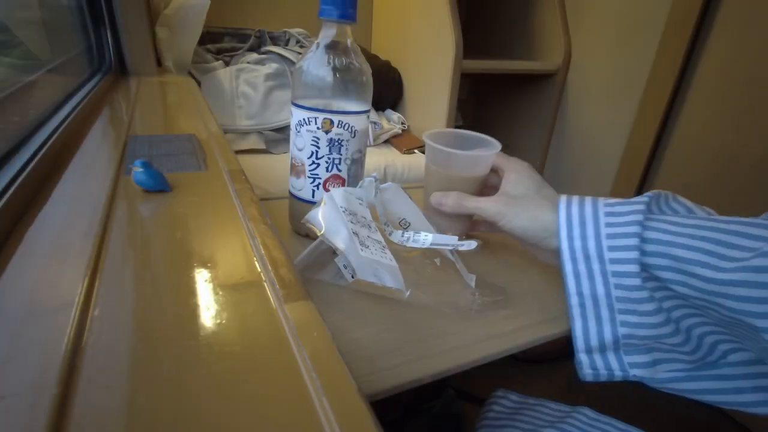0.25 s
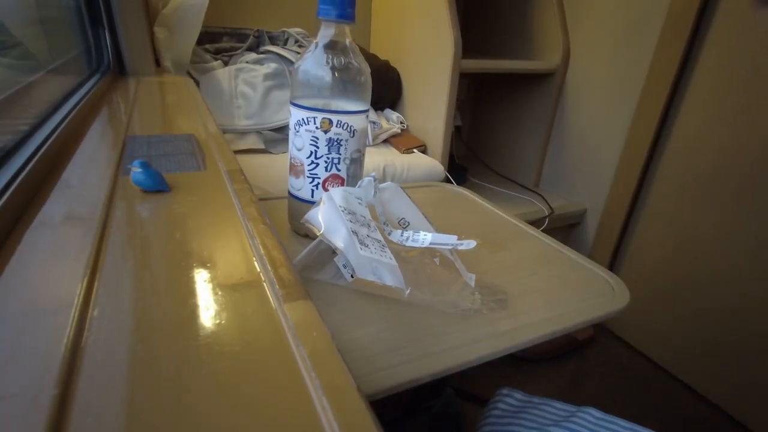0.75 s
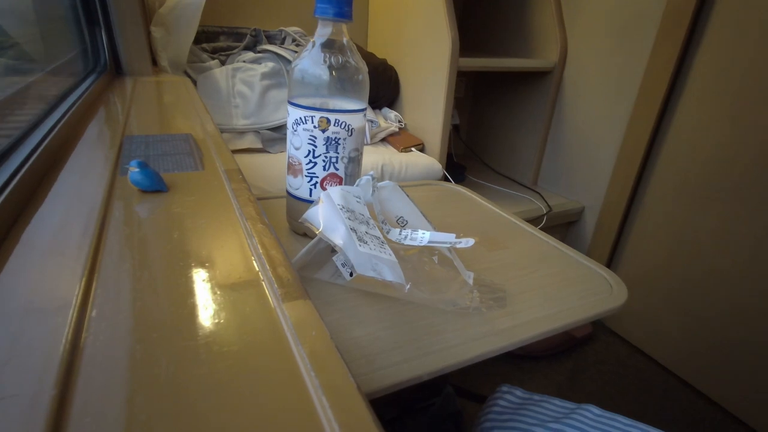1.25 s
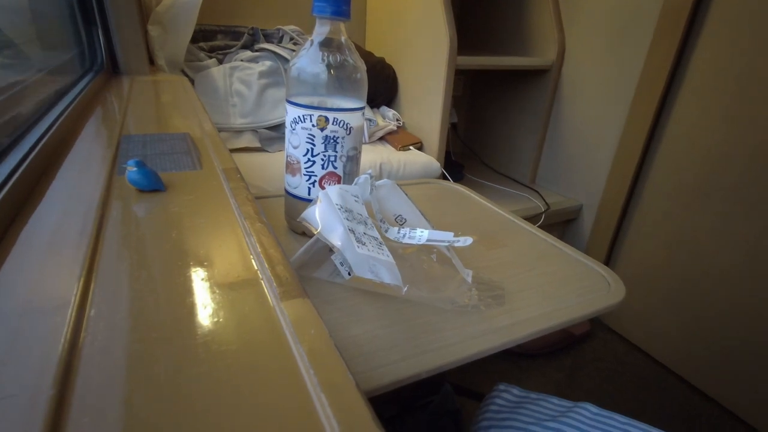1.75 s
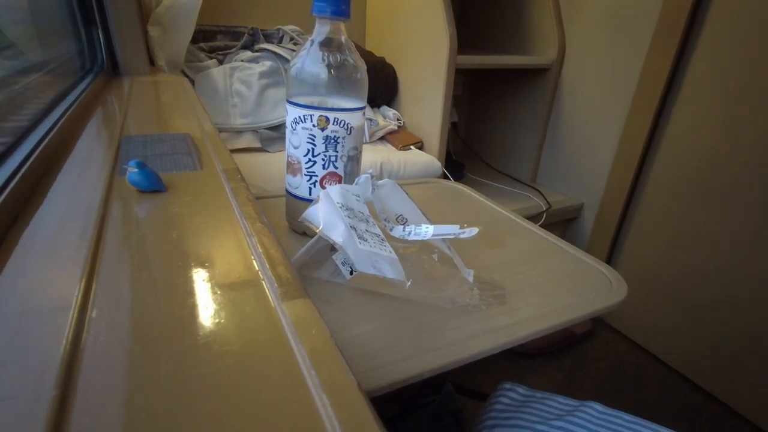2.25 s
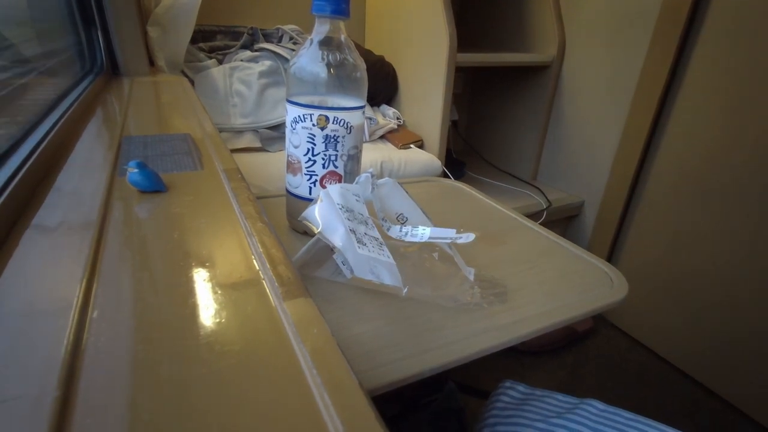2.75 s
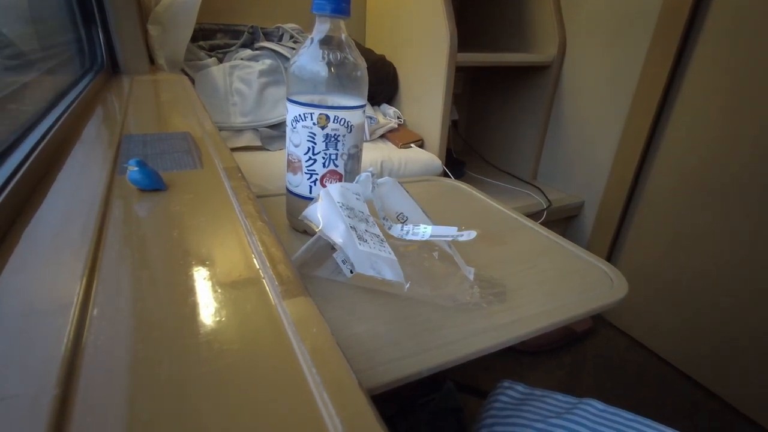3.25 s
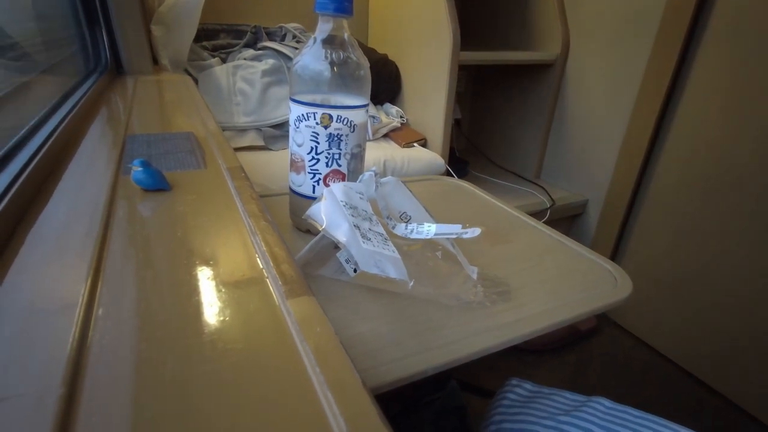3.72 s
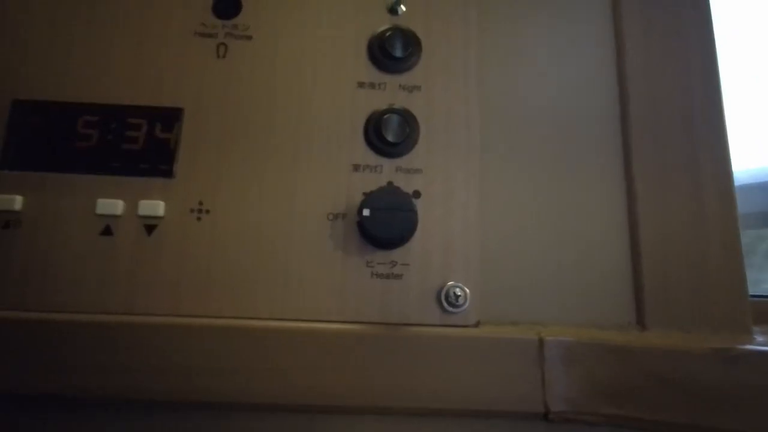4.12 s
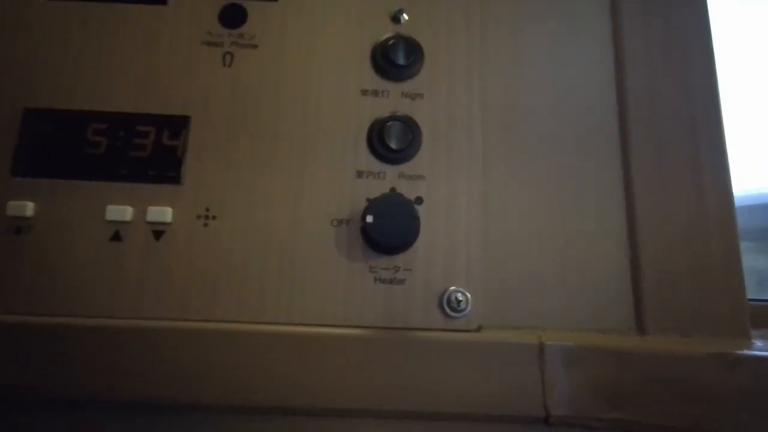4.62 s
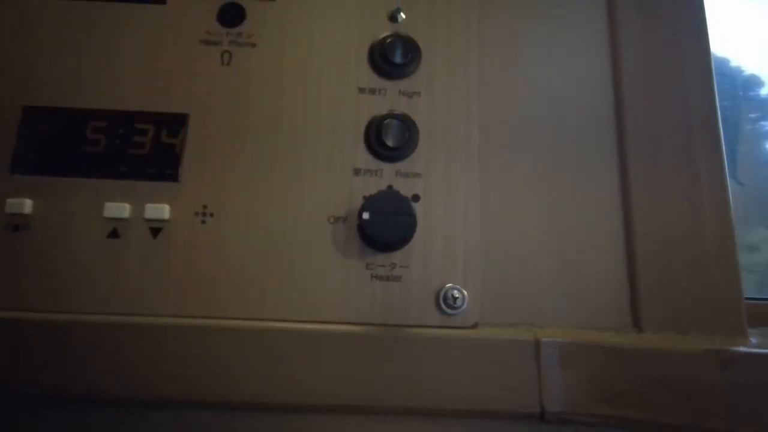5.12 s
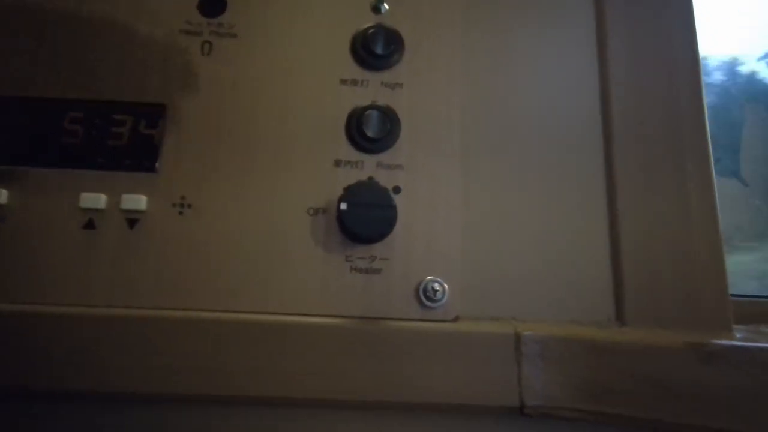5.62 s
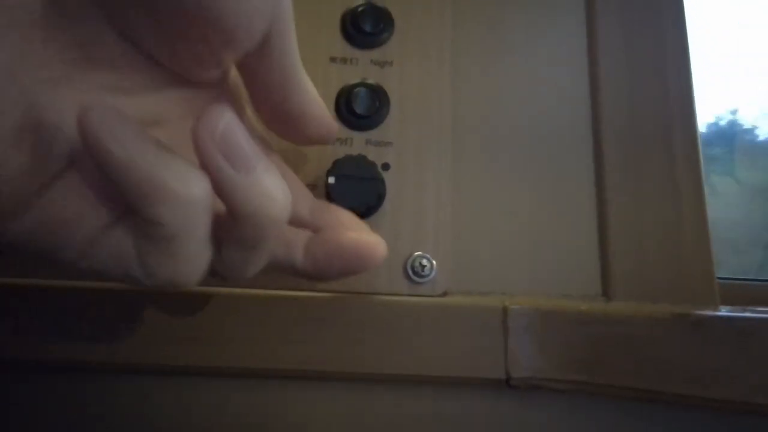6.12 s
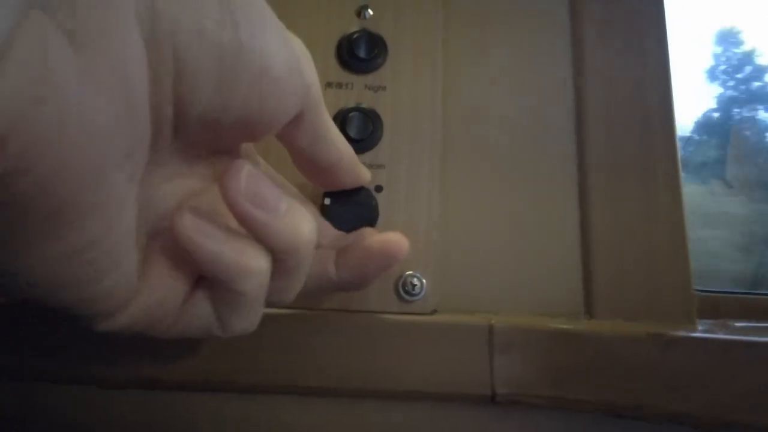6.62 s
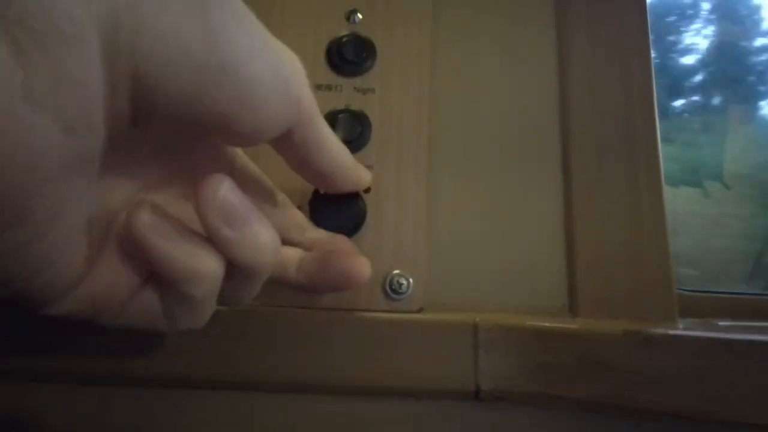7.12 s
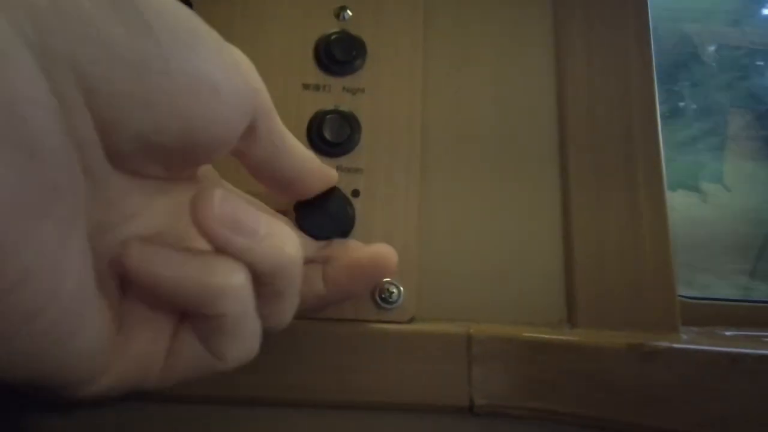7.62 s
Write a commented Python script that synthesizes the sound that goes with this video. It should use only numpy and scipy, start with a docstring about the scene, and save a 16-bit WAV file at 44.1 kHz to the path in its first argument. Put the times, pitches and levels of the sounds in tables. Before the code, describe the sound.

Close interior listening in a moving train: the first three seconds are rough, with dense hollow bangs, booming floor, rattling fittings and thin paper crackles. It eases, a sharp click follows, and the listening place shifts beside the window. There the train rolls more quietly with steady air rush, faint motor hum, a very high thin whistle, three spaced rail-joint thumps and two tiny ticks.

```python
"""Sleeper cabin of a running train

Wheels roll with a steady rumble and jolt over points; each blow is a burst of chatter and a strike that
rings floor, panels, truck and fittings. The shaking makes a paper wrapper crackle on the table.
After a dry click the train is heard from the window wall, thumping over a rail joint about once a second.
Flanges scrape now and then as resonant noise, air rushes past, a motor hums as a wavering sine."""
import sys
import numpy as np
from scipy import signal
from scipy.fft import rfft, irfft, next_fast_len
from scipy.io import wavfile
from scipy.ndimage import uniform_filter1d, map_coordinates

SR = 44100
rng = np.random.default_rng(int(sys.argv[2]) if len(sys.argv) > 2 else 0)


def to_wav(sig):
    """Store sig (one row per channel, or 1-D mono) as 16-bit WAV at the path in sys.argv[1].

    Samples outside -1..1 are clipped; the rate is SR.
    """
    pcm = np.clip(np.atleast_2d(sig), -1, 1) * 32767
    pcm = np.round(pcm).astype(np.int16)
    wavfile.write(sys.argv[1], SR, pcm.T)  # frames by channels


N = 346626
TIME_S = np.arange(N) / SR

# resonances; all mode tables: (centre [Hz], width [Hz], relative level [dB])
FLOOR_MODES = [(56.7, 11, -16.5), (99.7, 18, 0.5), (139.3, 15, 0), (197.8, 22.2, 4.5)]
# wall panels: (centre [Hz], width [Hz], relative level [dB])
PANEL_MODES = [(253.6, 22, -10), (324.2, 24.6, -0.5), (433.5, 27, -7), (494.7, 27, -12.5)]
# wheel truck: (centre [Hz], width [Hz], relative level [dB])
TRUCK_MODES = [(576, 43, -2), (653, 41, 3.5), (749, 72, -0.5), (884.5, 39.7, -5), (1000, 120, -18)]
# cabin fittings: (centre [Hz], width [Hz], relative level [dB])
FITTING_MODES = [(1230, 140, -10), (1534, 70, 3), (1900, 160, 0), (2104, 83, 2), (2550, 360, -9.5),
                 (3100, 220, -13), (3430, 360, -19)]
# car body: (centre [Hz], width [Hz], relative level [dB])
BODY_MODES = [(178, 48, 0), (336, 51, 2), (446, 34, 1), (567.5, 40, -7), (702, 45, -10.5), (776, 68, -13)]
# flange on rail: (centre [Hz], width [Hz], relative level [dB])
FLANGE_MODES = [(540, 110, -2), (762, 50, 7.5), (864, 25, 7.5), (1060, 50, -10.5), (1192, 45, -11)]
# sidewall on rough rail: (centre [Hz], width [Hz], relative level [dB])
DRONE_MODES = [(144, 4.4, 3), (171.4, 21, -0.5)]

# rumble spectrum: (frequency [Hz], relative density [dB per Hz])
RUMBLE_SPECTRUM = [(12, -20), (25, -22), (55, -2.5), (76, -8), (100, 1), (125, -2.5), (150, -5), (190, 1),
                   (225, -7), (275, -8.5), (400, -21.5), (600, -24.5), (1000, -69), (2000, -120)]
# air rush spectrum: (frequency [Hz], relative density [dB per Hz])
AIR_SPECTRUM = [(300, -48.5), (500, -12), (620, 0), (780, -3.5), (880, -6.5), (1100, -16), (1350, -20),
                (1520, -20), (1700, -21.5), (2050, -16), (2600, -26), (3300, -27.5), (5000, -34),
                (9000, -36), (15500, -38.5)]
# paper spectrum: (frequency [Hz], relative density [dB per Hz])
PAPER_SPECTRUM = [(1500, -26.5), (3200, -1), (4700, -15.5), (5900, -5), (7100, -1), (8600, -17),
                  (11000, -19.5), (16000, -26)]
# click spectrum: (frequency [Hz], relative level [dB])
CLICK_SPECTRUM = [(500, -43), (1200, 4.5), (2000, -7), (4000, -10), (9000, -15.5), (15000, -23.5)]
# cabin colouring of the train by the window wall: (frequency [Hz], gain [dB])
WINDOW_GAIN = [(55, 0), (95, 3.5), (140, 1), (200, -1.5), (300, 2), (450, -1.5), (720, -1.5), (1000, 4.5),
               (1300, -0.5), (1530, 0), (1750, -2), (2060, -2), (2600, -5), (3300, -1.5), (8000, 0)]

# rolling, before trims: (time [s], rumble [dB], track roughness [dB])
ROLL = [(0.0, -36, -42.5), (0.22, -48.5, -46), (0.53, -34.5, -31.5), (0.74, -42.5, -42.5),
        (1.2, -30.5, -42), (1.42, -43, -44.5), (1.73, -47, -44.5), (1.88, -33, -29.5), (1.97, -28.5, -30.5),
        (2.34, -34.5, -33), (2.74, -33, -33.5), (3.48, -39.5, -51), (4.42, -43.5, -54.5), (4.92, -39, -54),
        (5.47, -40, -51), (6.06, -39.5, -45), (6.26, -42, -49), (7.86, -41.5, -47)]
# flange scrapes: (time [s], length [s], level [dB])
SCRAPES = [(0.551, 0.34, -41.5), (2.405, 0.11, -49.5), (3.049, 0.24, -39), (7.188, 0.17, -47.5)]
# ticks and rattles: (time [s], peak [dB], centre [Hz], width before steepening [Hz], noise t60 [s])
TICKS = [(0.529, -63, 3360, 603, 0.35), (0.965, -47.5, 3330, 1200, 0.17), (1.03, -62.5, 3380, 300, 0.99),
         (5.61, -38.5, 1220, 1090, 0.016), (5.768, -41, 990, 900, 0.014)]
# loudest wrapper snaps: (time [s], peak before trim [dB])
SNAPS = [(0.4194, -50), (0.4508, -45), (0.4617, -42), (0.4712, -37), (0.5282, -46), (1.0889, -50.5),
         (1.8878, -45.5), (2.0697, -51.5), (2.833, -50.5), (3.0684, -53.5), (3.1232, -52)]
# gaps in the points, levels before trims: (time [s], panel knock [dB], floor boom [dB],
# truck clank [dB], fittings ring [dB], second axle relative to first [dB])
POINTS = [(0.447, -5, -34, -25.5, -46, -2), (1.226, -17.5, -31.5, -40.5, -70, -6.5),
          (1.898, -12.5, -17, -27.5, -49.5, -0.5), (1.947, -14.5, -12, -24, -54, -1.5),
          (2.693, -5.5, -23, -23.5, -47.5, -3)]
# rail joints, levels before trims: (time [s], panel knock [dB], floor boom [dB], boom pitch [Hz],
# truck clank [dB], settling boom [dB])
JOINTS = [(4.786, -25.5, -26, 140.5, -37.5, -25.5), (5.848, -20, -29.5, 189, -34, -38.5),
          (6.907, -24, -27, 127, -34.5, -21)]
# single jolts, levels before trims: (time [s], panel knock [dB], floor boom [dB], boom pitch [Hz],
# truck clank [dB])
JOLTS = [(0.205, -24.5, -40.5, 196, -60), (0.323, -14, -49, 234, -54.5), (0.966, -12, -20.5, 140, -31),
         (1.464, -25.5, -52.5, 222, -53), (1.698, -12.5, -48, 238, -57), (1.766, -16.5, -20.5, 190, -33.5),
         (1.84, -15, -24.5, 152, -49.5), (2.177, -18.5, -26.5, 231, -38), (2.33, -24, -23.5, 192, -43.5),
         (3.003, -34, -29, 100, -48), (3.121, -15.5, -36, 229, -41), (3.572, -35, -42, 155, -44),
         (3.932, -35, -32, 100, -54), (4.613, -42, -31, 196, -61), (6.192, -38.5, -37.5, 110, -44)]

TOP_HZ = 15550
WINDOW_S, CROSSFADE_S = 3.9825, 0.011  # move to the window wall
AIR_DB, AIR_WAVER_DB, AIR_WAVER_PER_S = -56, 0.45, 7
MOTOR_HZ, MOTOR_TABLE_DB, MOTOR_WINDOW_DB = 797, -56.5, -63
WHINE_HZ, WHINE_DB = 6000, -87.5
SWOOPS_PER_S, SWOOP_BASE_S, SWOOP_TOP_HZ, SWOOP_BASE_DEPTH_HZ, SWOOP_WAVER_HZ = 12, 0.07, 16000, 2900, 330
WHISTLE_DB = -78
RUMBLE_TRIM_DB, BODY_TRIM_DB = 1.5, 1
DRONE_S, DRONE_LENGTH_S, DRONE_DB = 2.95, 0.78, -36
SNAP_TRIM_DB = -1
CREASES_PER_S, CREASE_SCATTER_DB, CREASE_T60_S = 93, 5, 0.0072
RUSTLE_DB, RUSTLE_DB_PER_SHAKE_DB, SHAKE_WINDOW_S = -78.5, 0.3, 0.08
LEAD_S = .05  # chatter ahead of the strike
# base t60s: each set of modes stretches them
POINTS_AXLE_GAP_S, POINTS_BASE_T60_S, POINTS_BOOM_HZ = 0.122, 0.12, 205
JOINT_AXLE_GAP_S, JOINT_BASE_T60_S = 0.097, 0.2
JOLT_BASE_T60_S = 0.17
SETTLE_S, SETTLE_HZ, SETTLE_BASE_T60_S = 0.145, 100, 0.12
JOINT_RING_DB, JOLT_RING_DB = -18.5, -22.5  # relative to the clank
SECOND_BOOM_DB, SECOND_RING_DB, JOINT_SECOND_KNOCK_DB = 2.5, -4, 3.5  # second axle relative to first
REBOUND_S, REBOUND_DB, REBOUND_BOOM_DB, REBOUND_T60_RATIO = 0.02, -8.5, -2, 1.52


def amp(db):
    """Decibels to gain."""
    return 10 ** (np.asarray(db) / 20)


def unit(x):
    """x at rms 1."""
    return x / np.sqrt(np.mean(x ** 2) + 1e-20)


def curves(rows):
    """One value per sample for each column after the time."""
    s, *cols = np.transpose(rows)
    return [np.interp(TIME_S, s, c) for c in cols]


def wobble(knots_per_s):
    """Smooth random curve."""
    knots = rng.standard_normal(int(N * knots_per_s / SR) + 4)
    return map_coordinates(knots, [TIME_S * knots_per_s])


def filtered(x, response):
    """x times a complex response of frequency."""
    size = next_fast_len(len(x) + 8192)
    spectrum = rfft(x, size) * response(np.fft.rfftfreq(size, 1 / SR))
    return irfft(spectrum, size)[:len(x)]


def colour(points):
    """Response through (Hz, dB) points on a log axis."""
    hz, db = np.transpose(points)
    return lambda f: amp(np.interp(np.log(f + 1), np.log(hz), db))


def resonant(modes):
    """Causal response of a set of modes; the cabin lining absorbs what lies above them."""
    edge_hz = 1.258 * max(hz for hz, _, _ in modes)

    def response(f):
        total = 0
        for k, (hz, width_hz, db) in enumerate(modes):
            mode = 1j * f * width_hz / (hz * hz - f * f + 1j * f * width_hz)
            total = total + (-1) ** k * amp(db) * mode  # alternating polarity
        lining = signal.freqs(*signal.butter(N=6, Wn=1, analog=True), f / edge_hz)[1]
        return lining * total

    return response


def fade(t, t60):
    """Exponential decay, 60 dB in t60."""
    return np.exp(-np.log(1000) * t / t60)


def add(track, s, sound):
    """Mix a sound into the track at s seconds."""
    part = track[max(round(s * SR), 0):][:len(sound)]
    part += sound[:len(part)]


def arch(s, length_s):
    """Rounded swell from s seconds on."""
    return np.abs(np.sin(np.pi * np.clip((TIME_S - s) / length_s, 0, 1))) ** 0.44


def near_window():
    """0 over the table, 1 by the window wall."""
    return np.clip((TIME_S - WINDOW_S) / CROSSFADE_S, 0, 1)


def whistle():
    """Thin, very high whistle dips in short swoops; the longer a swoop, the deeper it goes."""
    out, waver_hz = np.zeros(N), SWOOP_WAVER_HZ * wobble(90)
    for place, size in rng.random((round(SWOOPS_PER_S * N / SR), 2)):
        stretch = 2 ** (2 * size - 1)
        dip = np.sin(np.linspace(0, np.pi, round(SWOOP_BASE_S * stretch * SR)))
        hz = SWOOP_TOP_HZ - SWOOP_BASE_DEPTH_HZ * stretch * dip
        hz = hz + np.roll(waver_hz, -int(place * N))[:len(dip)]
        swoop = np.sqrt(np.abs(dip)) * np.sin(2 * np.pi * np.cumsum(hz) / SR)
        add(out, place * N / SR, swoop)
    return amp(WHISTLE_DB + 2.5 * wobble(30)) * out


def air():
    """Even rush of air along the car: coloured noise."""
    rush = unit(filtered(rng.standard_normal(N), colour(AIR_SPECTRUM)))
    return rush * amp(AIR_DB + AIR_WAVER_DB * wobble(AIR_WAVER_PER_S))


def motor():
    """Slightly unsteady motor hum, weaker by the window, and a faint electrical whine."""
    hz = MOTOR_HZ * (1 + .003 * wobble(21))
    level_db = MOTOR_TABLE_DB + (MOTOR_WINDOW_DB - MOTOR_TABLE_DB) * near_window()
    hum = amp(level_db + 4.0 * wobble(11)) * np.sin(2 * np.pi * np.cumsum(hz) / SR)
    whine = amp(WHINE_DB) * np.sin(2 * np.pi * WHINE_HZ * TIME_S)
    return hum + whine


def drone():
    """Rough rail keeps two sidewall modes humming for a while."""
    hum = unit(filtered(rng.standard_normal(N), resonant(DRONE_MODES)))
    return amp(DRONE_DB) * arch(DRONE_S, DRONE_LENGTH_S) * hum


def rolling():
    """Wheels rumble through the floor; rough track shakes the body modes as well."""
    rumble_db, rough_db = curves(ROLL)
    sway = wobble(11)  # shared by both
    rumble = unit(filtered(rng.standard_normal(N), colour(RUMBLE_SPECTRUM)))
    rumble = rumble * amp(rumble_db + RUMBLE_TRIM_DB + 3.5 * sway)
    body = unit(filtered(rng.standard_normal(N), resonant(BODY_MODES)))
    body = body * amp(rough_db + BODY_TRIM_DB + 0.51 * sway + 1.2 * wobble(22))
    return rumble + body


def flanges():
    """A flange rubs the rail in short swells of resonant noise."""
    swell = sum(amp(db) * arch(s, length_s) for s, length_s, db in SCRAPES)
    scrape = unit(filtered(rng.standard_normal(N), resonant(FLANGE_MODES)))
    return swell * scrape * amp(1.1 * wobble(32))


def ticks():
    """Small ticks and rattles: decaying noise, each in one resonance with steep skirts."""
    out, t = np.zeros(N), np.arange(SR // 3) / SR
    for s, db, hz, width_hz, t60 in TICKS:
        band = lambda f: (1j * f * width_hz / (hz * hz - f * f + 1j * f * width_hz)) ** 4
        tick = filtered(rng.standard_normal(len(t)) * fade(t, t60), band)
        add(out, s, amp(db) * tick / np.abs(tick).max())
    return out


def click():
    """One sharp, dry click as the listening place changes: a coloured impulse."""
    pulse = np.zeros(N)
    add(pulse, WINDOW_S, np.ones(1))
    snap = filtered(pulse, colour(CLICK_SPECTRUM))
    return amp(-30) * snap / np.abs(snap).max()


def wrapper(train):
    """The harder the train shakes the table, the louder the wrapper's tiny creases; at times it snaps."""
    snaps, t = np.zeros(N), np.arange(SR // 40) / SR
    crumple = fade(t, .022) * (1 - fade(t, .004))
    for s, db in SNAPS:
        burst = np.pad(rng.standard_normal(len(t)) * crumple, (SR // 1000, 0))  # 1 ms of lead
        snap = filtered(burst, colour(PAPER_SPECTRUM))
        add(snaps, s - .001, amp(db + SNAP_TRIM_DB) * snap / np.abs(snap).max())
    power = np.abs(uniform_filter1d(train ** 2, size=round(SHAKE_WINDOW_S * SR)))
    shake = unit(np.sqrt(power))
    scatter = amp(CREASE_SCATTER_DB * rng.standard_normal(N).clip(-2, 2))
    creases = (rng.random(N) < CREASES_PER_S / SR) * scatter
    grains = signal.fftconvolve(creases, fade(t, CREASE_T60_S))[:N] * rng.standard_normal(N)
    rustle = unit(filtered(grains, colour(PAPER_SPECTRUM)))
    return snaps + amp(RUSTLE_DB) * shake ** RUSTLE_DB_PER_SHAKE_DB * rustle


def shudder(modes, t60, strike, build):
    """Chatter builds up to a strike on the modes and dies away; its loudest 30 ms have rms 1."""
    t = np.arange(SR // 2) / SR - LEAD_S
    after = t - 0.031 * t60
    # build: rise time as a share of t60
    swell = fade(np.maximum(-after, 0), build * t60) * fade(np.maximum(after, 0), t60)
    force = rng.standard_normal(len(t)) * swell
    force = force / np.linalg.norm(force)
    force[round(LEAD_S * SR)] += strike
    ring = filtered(force, resonant(modes))
    return ring / np.sqrt(uniform_filter1d(ring ** 2, size=1323).max())


def boom(db, boom_hz, t60):
    """The floor modes nearest to the pitch of a blow take most of its energy."""
    floor = []
    for hz, width_hz, level_db in FLOOR_MODES:
        floor.append((hz, width_hz, level_db - 16 * abs(np.log2(hz / boom_hz))))  # 16 dB per octave
    return amp(db - 4.0) * shudder(floor, 1.34 * t60, strike=0.63, build=0.95)


def blow(knock_db, boom_db, boom_hz, clank_db, ring_db, t60):
    """A wheel strikes and rebounds: floor booms, panels knock, truck clanks, fittings ring."""
    out = np.zeros(SR)
    landings = [(0, 0, 0, t60), (REBOUND_S, REBOUND_DB, REBOUND_BOOM_DB, REBOUND_T60_RATIO * t60)]
    for s, db, low_db, decay in landings:
        knock = amp(knock_db - 11.5) * shudder(PANEL_MODES, 1.18 * decay, strike=0.61, build=.25)
        clank = amp(clank_db - 5.0) * shudder(TRUCK_MODES, 1.36 * decay, strike=.25, build=0.41)
        ring = amp(ring_db - 4.0) * shudder(FITTING_MODES, 1.98 * decay, strike=0.092, build=0.073)
        low = boom(boom_db + low_db, boom_hz, decay)
        add(out, s, low + amp(db) * (knock + clank + ring))
    return out


def jolts():
    """Uneven track throws the car about in single blows."""
    out = np.zeros(N)
    for s, knock_db, boom_db, boom_hz, clank_db in JOLTS:
        ring_db = clank_db + JOLT_RING_DB
        add(out, s - LEAD_S, blow(knock_db, boom_db, boom_hz, clank_db, ring_db, JOLT_BASE_T60_S))
    return out


def joints():
    """Two axle thumps at each rail joint, then a deep boom as the floor settles."""
    out = np.zeros(N)
    for s, knock_db, boom_db, boom_hz, clank_db, settle_db in JOINTS:
        ring_db = clank_db + JOINT_RING_DB
        first = blow(knock_db, boom_db, boom_hz, clank_db, ring_db, JOINT_BASE_T60_S)
        second = blow(knock_db + JOINT_SECOND_KNOCK_DB, boom_db + SECOND_BOOM_DB, boom_hz,
                      clank_db, ring_db + SECOND_RING_DB, JOINT_BASE_T60_S)
        add(out, s - LEAD_S, first)
        add(out, s - LEAD_S + JOINT_AXLE_GAP_S, second)
        add(out, s - LEAD_S + SETTLE_S, boom(settle_db, SETTLE_HZ, SETTLE_BASE_T60_S))
    return out


def points():
    """Both axles of a truck hit each gap in the points."""
    out = np.zeros(N)
    for s, knock_db, boom_db, clank_db, ring_db, second_db in POINTS:
        first = blow(knock_db, boom_db, POINTS_BOOM_HZ, clank_db, ring_db, POINTS_BASE_T60_S)
        second = blow(knock_db, boom_db + SECOND_BOOM_DB, POINTS_BOOM_HZ,
                      clank_db, ring_db + SECOND_RING_DB, POINTS_BASE_T60_S)
        add(out, s - LEAD_S, first)
        add(out, s - LEAD_S + POINTS_AXLE_GAP_S, amp(second_db) * second)
    return out


def scene():
    """The train is heard first over the table, then from close to the window wall."""
    running = air() + motor() + drone() + rolling() + flanges()
    train = running + jolts() + joints() + points()
    near = near_window()
    by_table = train + wrapper(train)
    by_window = filtered(train, colour(WINDOW_GAIN)) + whistle()
    mix = (1 - near) * by_table + near * by_window + ticks() + click()
    return mix[None]


def record(dry):
    """Band limit: nothing passes at or above TOP_HZ."""
    return filtered(dry[0], lambda f: f < TOP_HZ)[None]


dry = scene()
out = record(dry)
to_wav(out)
```